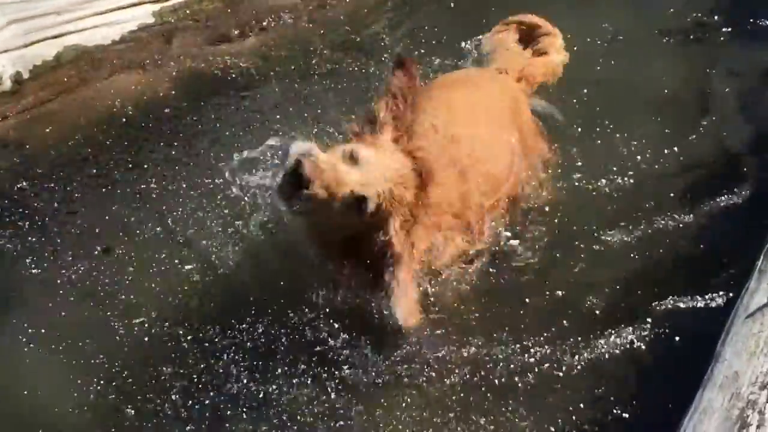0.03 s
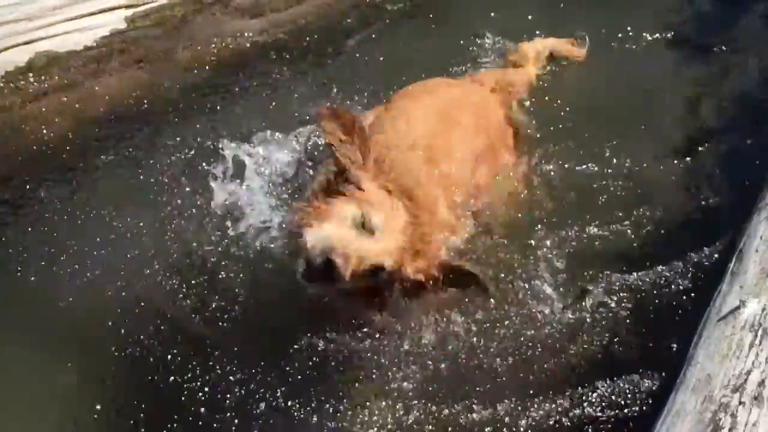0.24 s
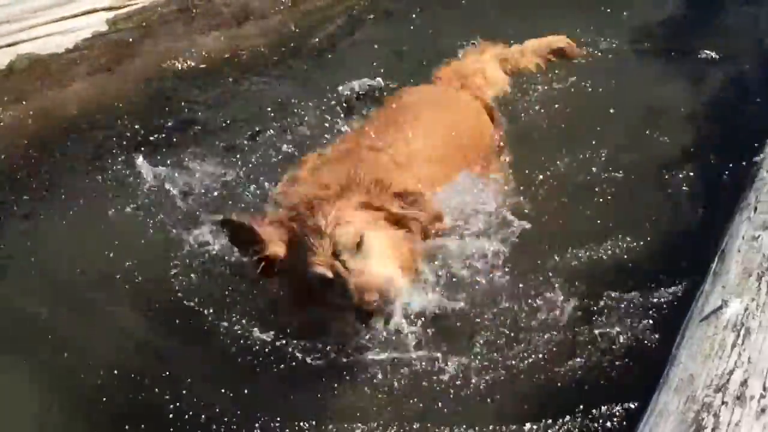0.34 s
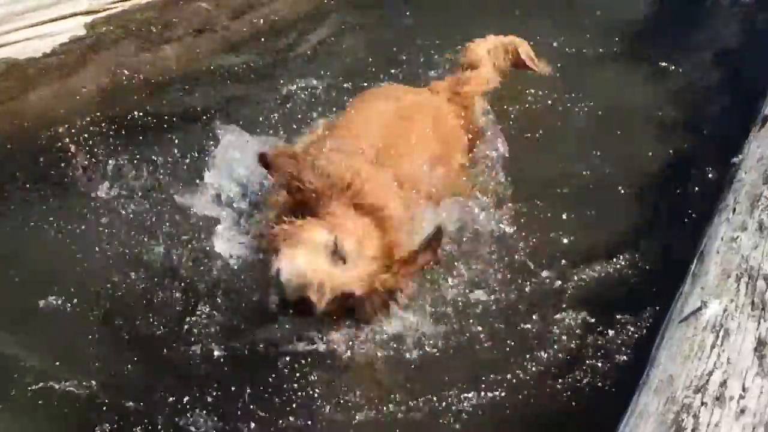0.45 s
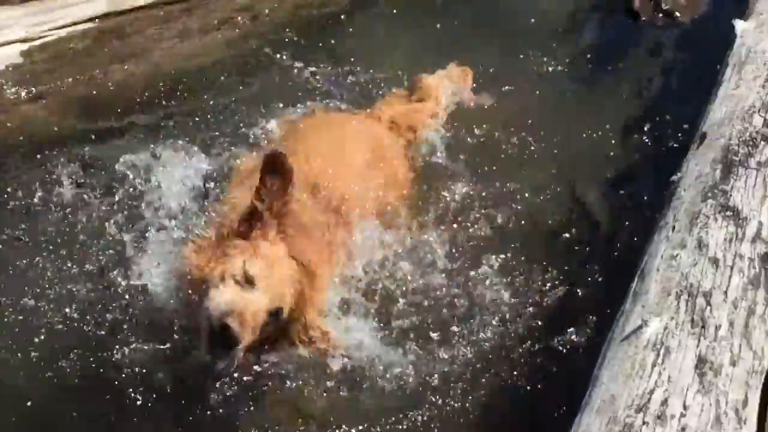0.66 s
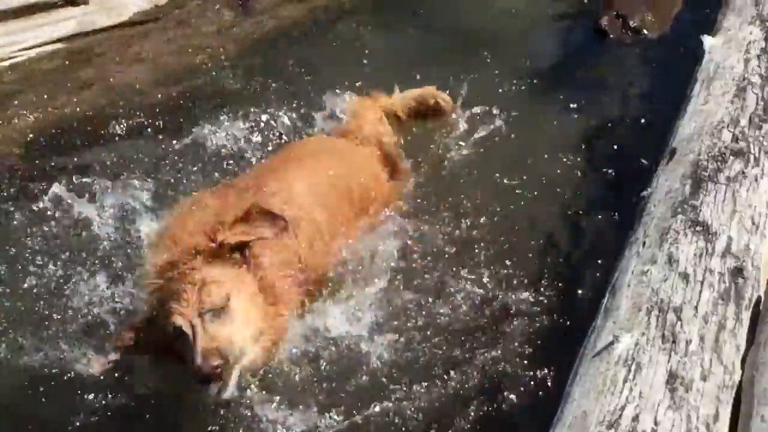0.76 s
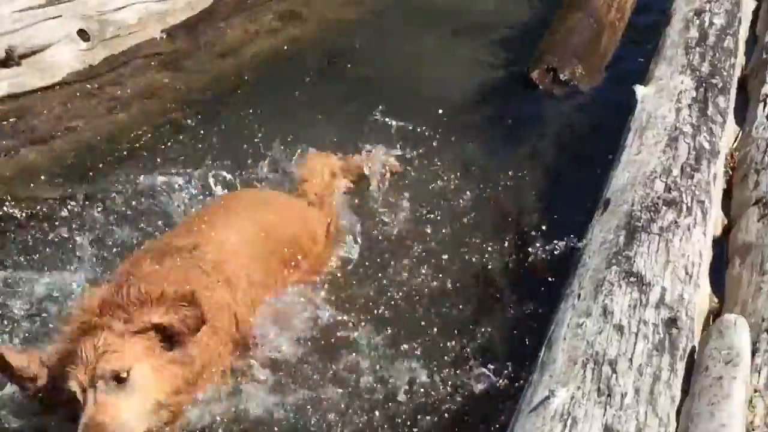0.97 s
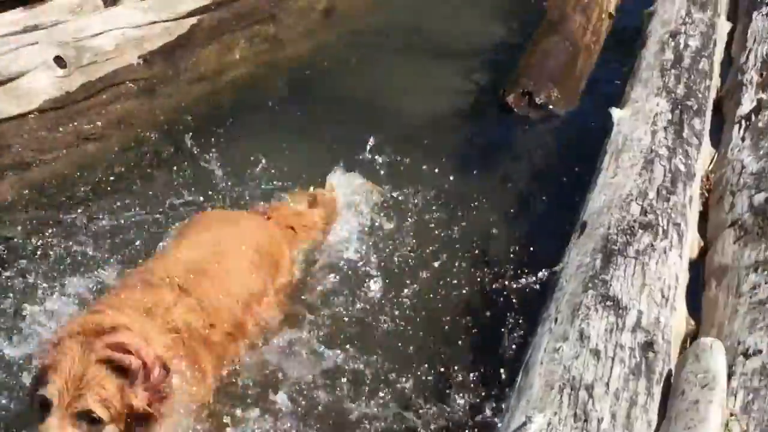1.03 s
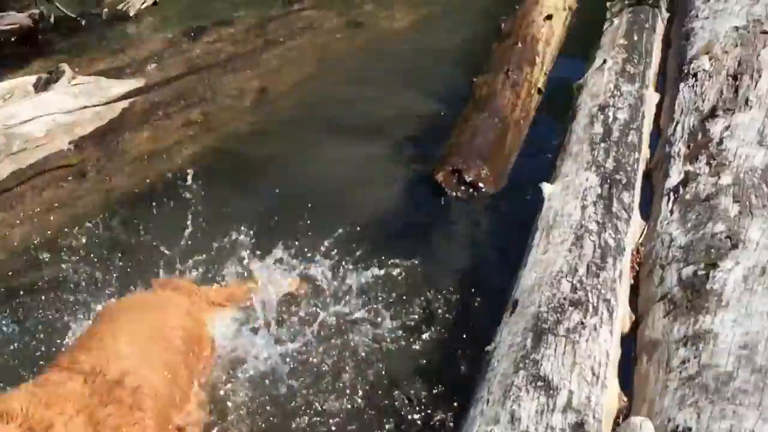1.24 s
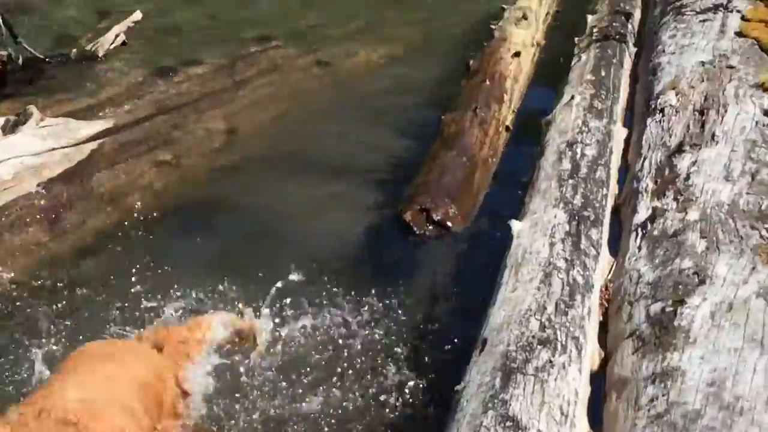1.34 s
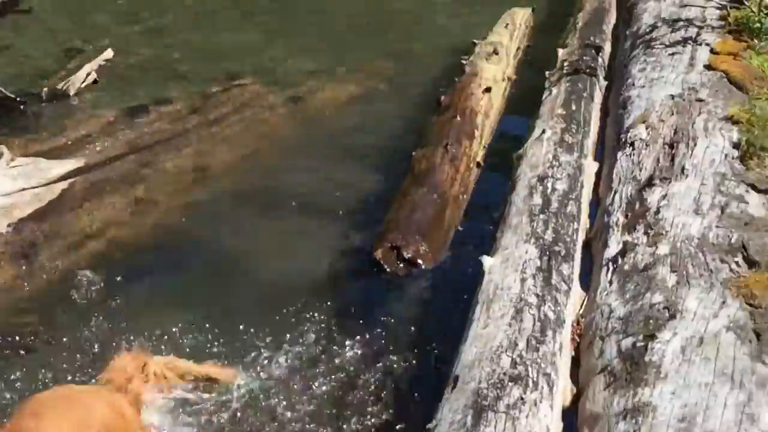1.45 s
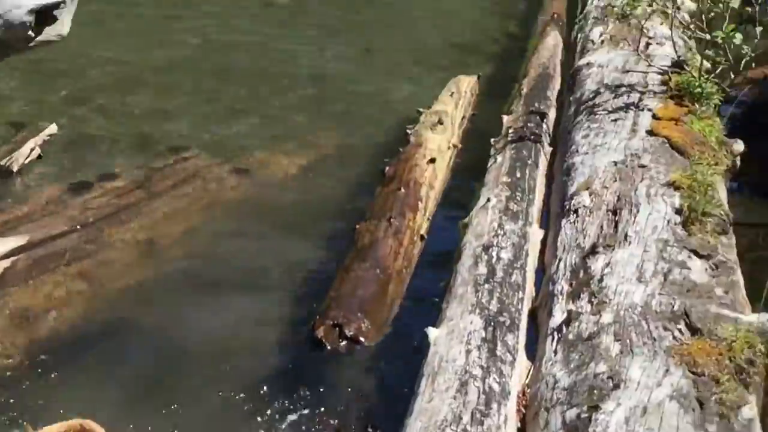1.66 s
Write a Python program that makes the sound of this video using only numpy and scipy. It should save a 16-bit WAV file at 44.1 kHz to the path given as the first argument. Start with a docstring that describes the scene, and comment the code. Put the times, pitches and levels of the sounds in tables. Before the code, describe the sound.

Close up and outdoors, a wet dog shakes off in rapid bursts of spray and ear claps. Falling drops fizz on the shallow water over a faint rumble of air, and a few soft wading splashes follow.

```python
"""A soaked dog shakes itself in a shallow lake, about ten half-turns a second, then wades off.
At each turn its ears and coat whip out a sheet of spray, and now and then a wet ear claps on its head.
Drops patter back on the lake, the legs churn the water, and trapped pockets of air ring as plops.
Ripples and nearby logs give the shaking a short echo, and moving air rumbles softly underneath."""
import sys
import numpy as np
from scipy import signal
from scipy.fft import rfft, irfft
from scipy.io import wavfile

SR = 44100
rng = np.random.default_rng(int(sys.argv[2]) if len(sys.argv) > 2 else 0)


def inscribe(sig):
    """Save sig as 16-bit PCM at rate SR to the path in sys.argv[1].

    A 1-D sig is mono; a 2-D sig holds one channel per row.
    Samples are clipped to [-1, 1] before scaling.
    """
    pcm = np.round(np.clip(np.atleast_2d(sig).T, -1, 1) * 32767)
    wavfile.write(sys.argv[1], SR, pcm.astype(np.int16))


N = 74970
TIME = np.arange(N) / SR
TOP_HZ = 15900   # treble above this is cut away


def from_db(db):
    """Turn decibels into a number to multiply by."""
    return 10 ** (np.asarray(db) / 20)


def rms_one(x):
    """Scale a sound so that its average strength (rms) is 1."""
    return x / np.sqrt(np.mean(x ** 2) + 1e-20)


def level(curve):
    """Join (time [s], level [dB]) points into a smooth volume curve."""
    return from_db(np.interp(TIME, *np.transpose(curve)))


def coloured(x, colour, tilt_db=0):
    """Shape a sound's bass and treble, brighter by tilt_db per octave; strength 1."""
    octave = np.log2(np.maximum(np.fft.rfftfreq(N, 1 / SR), 1))
    hz, db = np.transpose(colour)
    octaves_outside = np.maximum(np.log2(hz[0]) - octave, 0) + np.maximum(octave - np.log2(hz[-1]), 0)
    gain_db = np.interp(octave, np.log2(hz), db) + tilt_db * octave - 20 * octaves_outside
    return rms_one(irfft(rfft(x) * from_db(gain_db), N))


def swell(s, rise_s, fall_s):
    """A volume curve that grows to a peak at time s, then dies away."""
    return np.exp(-np.maximum((s - TIME) / rise_s, (TIME - s) / fall_s))


def wander(step_s):
    """A new random value every step, joined by straight lines."""
    return np.interp(TIME / step_s, np.arange(N), rng.standard_normal(N))


def impacts(per_s, spread_db):
    """Clicks at random times and of random sizes."""
    sizes = from_db(spread_db * np.minimum(rng.exponential(1, N), 4))
    return sizes * rng.choice([-1, 1], N) * (rng.random(N) < per_s / SR)


def pulse(s, low_hz, high_hz, order):
    """A sudden push of air at time s that swings a few times; peak 1."""
    band = signal.butter(order, [low_hz, high_hz], "band", fs=SR, output="sos")
    wave = signal.sosfilt(band, signal.unit_impulse(N, int(s * SR)) + 1e-18)
    return wave / np.abs(wave).max()


def ring(clicks, hz, ring_s):
    """Each click starts a pure tone that fades by 60 dB in ring_s."""
    decay = np.exp(-np.log(1000) / (ring_s * SR))
    angle = 2 * np.pi * hz / SR
    return signal.lfilter([0, np.sin(angle)], [1, -2 * decay * np.cos(angle), decay * decay], clicks + 1e-18)


def bubbling(clicks, low_hz, high_hz, cycles, sizes):
    """Each click rings a bubble of a random size, and small, high ones fade sooner; strength 1."""
    size = rng.integers(0, sizes, N)
    pitches = np.geomspace(low_hz, min(high_hz, TOP_HZ), sizes)
    return rms_one(sum(hz * ring(clicks * (size == k), hz, cycles / hz) for k, hz in enumerate(pitches)))


def bubble(s, hz, ring_s, attack_s):
    """One bubble rings and fades, trembling in the stirred water and rising in pitch as its air shifts."""
    climb_per_s, wobble = 1.3, 0.019   # shares of the starting pitch
    wobble_s, wobble_db = 0.0045, 1.1
    age = np.maximum(TIME - s, 0)
    volume = (1 - np.exp(-age / attack_s)) * np.exp(-np.log(1000) * age / ring_s)
    pitch = hz * (1 + climb_per_s * age + wobble * wander(wobble_s)) * (age > 0)
    return volume * from_db(wobble_db * wander(wobble_s)) * np.sin(2 * np.pi * np.cumsum(pitch) / SR)


# How loud the moving air is: (time [s], level [dB])
AIR_LEVEL = [(0, -56.5), (.5, -55.5), (1.0, -56), (1.42, -60), (1.55, -75.5), (1.7, -74)]
# Its deep tone: (frequency [Hz], relative level [dB])
AIR_COLOUR = [(20, -30), (38, -10), (60, 2), (85, 4), (130, -9), (250, -7), (600, -46)]


def air_rumble():
    """Moving air makes a soft, low noise."""
    return level(AIR_LEVEL) * coloured(rng.standard_normal(N), AIR_COLOUR)


# How strongly the legs stir the water: (time [s], relative level [dB])
STIR_LEVEL = [(0, -47), (.04, -53), (.11, -65), (.17, -41.5), (.24, -51.5), (.33, -38.5), (.44, -54),
              (.49, -32), (.545, -45), (.61, -39.5), (.66, -39), (.81, -42.5), (1.10, -40.5), (1.18, -44),
              (1.28, -38.5), (1.34, -45.5), (1.47, -46.5), (1.57, -52), (1.64, -58.5), (1.7, -53.5)]
# The tone of stirred water: (frequency [Hz], relative level [dB])
STIR_COLOUR = [(120, -24), (280, -1), (400, -6), (620, 1), (900, -0.5), (1450, 0), (2100, -3.5),
               (2700, -12.5), (4500, -3)]


def churn():
    """Small bubbles ring in the rush of water around the legs."""
    churn_db, wash_db = 2.5, -6
    bubbles = bubbling(impacts(per_s=1500, spread_db=3.5), 523.5, 3070, cycles=27.7, sizes=44)
    wash = from_db(wash_db) * coloured(rng.standard_normal(N), STIR_COLOUR)
    water = coloured(bubbles, STIR_COLOUR) + wash
    return from_db(churn_db) * level(STIR_LEVEL) * rms_one(water)


# Big bubbles: (time [s], level [dB], starting pitch [Hz], time to fade by 60 dB [s])
BIG_BUBBLES = [(.005, -34, 680, 0.054), (.052, -28.5, 653, 0.056), (0.025, -35.5, 1513, 0.11),
               (0.055, -25, 1643, 0.036), (.148, -21, 640, 0.053), (.162, -30, 1600, 0.052),
               (.163, -23, 740, 0.017), (0.228, -24.5, 680, 0.045), (.297, -23, 584, 0.02),
               (.421, -20.5, 690, 0.03), (.495, -19.5, 538, 0.039), (0.574, -22.5, 1500, 0.037),
               (.590, -16, 616, 0.025), (.629, -21, 250, 0.031), (.631, -20, 505, 0.019),
               (.704, -24.5, 600, 0.045), (0.919, -21, 880, 0.018), (.992, -24, 587, 0.06),
               (1.190, -25, 320, 0.043), (1.253, -16.5, 497, 0.016), (1.370, -19, 300, 0.069),
               (1.494, -31.5, 473, 0.13), (1.55, -37.5, 368, 0.075), (1.658, -42.5, 660, 0.066),
               (1.659, -43, 1510, 0.099), (1.664, -42, 2090, 0.082), (1.682, -46, 1030, 0.065)]


def plops():
    """The legs trap large pockets of air, and each rings with a plop."""
    return sum(from_db(db) * bubble(s, hz, ring_s, attack_s=1 / hz) for s, db, hz, ring_s in BIG_BUBBLES)


# Drops that stand out: (time [s], level [dB], starting pitch [Hz])
SINGLE_DROPS = [(.035, -34, 6400), (0.047, -28, 3660), (0.057, -33, 6300), (.063, -35, 11300),
                (.064, -35, 14900), (.129, -38, 10500), (.135, -41, 11700), (.174, -30, 12600),
                (0.247, -29, 6350), (0.264, -28, 2900), (0.348, -24.5, 6430), (1.441, -26.5, 3760),
                (1.571, -31.5, 3530)]


def pings():
    """A single drop makes a tiny bubble with a short, high ring."""
    return sum(from_db(db) * bubble(s, hz, ring_s=0.013, attack_s=0.00015) for s, db, hz in SINGLE_DROPS)


# The tone of the ringing drops: (frequency [Hz], relative level [dB])
RINGING_DROP_COLOUR = [(1000, 2), (1600, 0.5), (2400, -2), (3600, -3.5), (5000, -10), (6400, -13),
                       (9000, -10), (14000, -30)]


def plinks():
    """Some of the falling drops trap a bubble that rings a little longer."""
    rings = bubbling(impacts(per_s=280, spread_db=2), 994, 13040, cycles=49, sizes=60)
    return coloured(rings, RINGING_DROP_COLOUR)


# How much water is falling back: (time [s], relative level [dB])
PATTER_LEVEL = [(0, -53), (.06, -52.5), (.11, -51.5), (.16, -46), (.23, -44), (.45, -46), (.545, -49.5),
                (.60, -40), (.655, -47), (.82, -45.5), (1.03, -45.5), (1.24, -44), (1.34, -46.5),
                (1.42, -42.5), (1.50, -49), (1.60, -47.5), (1.64, -60), (1.7, -61.5)]
# The tone of its patter: (frequency [Hz], relative level [dB])
PATTER_COLOUR = [(1200, 5.5), (2400, -7), (3600, 4), (5000, -6.5), (6300, -2), (8000, -8), (12000, -8),
                 (15500, -10)]


def falling_spray():
    """Flung drops fizz, tick and plink on the lake, over the hiss of a fine mist."""
    patter_db, plink_db = 4, -1
    tick_db, tick_fall_s, mist_db, clump_db = 1.5, 0.0015, -1.5, -0.5
    shake_end_s, fine_above_hz, fade_db_per_s = 1.02, 4900, 12.5
    fizz = bubbling(impacts(per_s=3500, spread_db=3), 2040, 16700, cycles=15, sizes=36)
    # Bigger drops hit the surface, each with a tiny burst of noise.
    hits = np.abs(impacts(per_s=150, spread_db=-1))
    bursts = signal.lfilter([1], [1, -np.exp(-1 / (tick_fall_s * SR))], hits + 1e-18)
    ticks = from_db(tick_db) * rms_one(bursts * rng.standard_normal(N))
    mist = from_db(mist_db) * rng.standard_normal(N)
    clumps = from_db(clump_db * wander(step_s=0.01))   # the water lands unevenly
    patter = coloured((fizz + ticks) * clumps + mist, PATTER_COLOUR)
    # The finest, highest spray dies out once the shaking stops.
    coarse = signal.sosfiltfilt(signal.butter(2, fine_above_hz, fs=SR, output="sos"), patter)
    fine = (patter - coarse) * from_db(-fade_db_per_s * np.maximum(TIME - shake_end_s, 0))
    return level(PATTER_LEVEL) * (from_db(patter_db) * (coarse + fine) + from_db(plink_db) * plinks())


def echo(x):
    """Ripples and logs bounce a sound back as a short, blurred echo."""
    echo_db, fade_s, delay_s = -14, 0.038, 0.0045
    tail = rng.standard_normal(N) * np.exp(-np.log(1000) * TIME / fade_s) * (TIME > delay_s)
    return from_db(echo_db) * signal.fftconvolve(x, tail / np.linalg.norm(tail))[:N]


def wet_crackle(colour, tilt_db):
    """Wet strands of fur and flying drops make a dense crackle."""
    return coloured(impacts(per_s=14000, spread_db=3.5), colour, tilt_db)


# Soft splashes: (time [s], level [dB], rise [s], fall [s], brightness [dB per octave])
SOFT_SPLASHES = [(0.057, -39, 0.02, 0.0021, -3), (.1485, -29.5, .001, 0.0014, -1),
                 (0.164, -33, 0.0058, 0.011, -.5), (0.265, -35.5, 0.0022, 0.0029, -0.5),
                 (.300, -32.5, 0.014, 0.0058, 2.5), (0.316, -29, 0.00058, 0.0031, -3),
                 (0.349, -35.5, 0.00053, 0.006, 11), (0.401, -30, 0.0079, 0.015, -.5),
                 (0.498, -33, 0.0033, .012, 0.5), (.518, -30, 0.0095, 0.0047, 1),
                 (0.612, -32.5, 0.017, 0.015, 2), (0.729, -29, 0.011, 0.0044, -.5),
                 (0.801, -29, 0.012, 0.025, -4), (0.822, -31.5, 0.012, 0.0052, 1),
                 (0.904, -27, 0.0033, 0.0025, -0.5), (0.936, -31, 0.024, 0.0082, -1.5),
                 (1.033, -33.5, 0.0084, 0.013, 0), (1.221, -33.5, 0.0019, 0.0068, 1.5),
                 (1.250, -33.5, 0.0056, 0.0088, 5), (1.371, -31.5, 0.0023, 0.0054, -3.5),
                 (1.407, -39.5, 0.0019, 0.015, -3), (1.4967, -30.5, 0.0005, 0.002, 0),
                 (1.53, -41, 0.00082, 0.0015, 16), (1.548, -34, 0.0027, 0.0075, 1.5),
                 (1.573, -43, 0.00084, 0.0012, -1)]
# Their tone: (frequency [Hz], relative level [dB])
SPLASH_COLOUR = [(230, 0), (400, -3), (700, 4), (1500, 1.5), (2400, -8), (3500, 0), (5000, -6.5),
                 (6500, -6.5), (10000, -12), (15500, -16)]


def soft_splashes():
    """Wet fur swishes between turns, and the feet splash lightly as the dog wades off."""
    return sum(from_db(db) * swell(s, rise_s, fall_s) * wet_crackle(SPLASH_COLOUR, tilt_db)
               for s, db, rise_s, fall_s, tilt_db in SOFT_SPLASHES)


# Ear slaps: (time [s], level [dB], low edge [Hz], high edge [Hz], ring pitch [Hz], ring vs. slap [dB])
EAR_SLAPS = [(0.2576, -13.5, 2780, 6600, 6090, -1.5), (0.3129, -7.5, 594, 2240, 780, -1),
             (0.5855, -20, 1300, 11300, 1500, -2), (0.6305, -10, 800, 3440, 1440, -15),
             (0.7904, -6, 860, 1670, 1370, -2), (1.0411, -16.5, 1510, 4400, 4080, -7),
             (1.1222, -12, 3000, 6100, 3560, -6)]


def ear_claps():
    """A wet ear slaps the head, and the pocket of air under it rings briefly."""
    out = np.zeros(N)
    low_cut = signal.butter(2, 810, "high", fs=SR, output="sos")
    for s, db, low_hz, high_hz, ring_hz, ring_db in EAR_SLAPS:
        pocket = signal.sosfilt(low_cut, bubble(s, ring_hz, ring_s=0.014, attack_s=0.0003))
        out += from_db(db) * (pulse(s, low_hz, high_hz, order=3) + from_db(ring_db) * pocket)
    return out


# Half-turns: (time [s], spray level [dB], rise [s], fall [s], brightness [dB per octave], thump [dB])
HALF_TURNS = [(.0830, -21.5, 0.0018, 0.0029, 1.5, -36.5), (0.1865, -19, 0.00033, 0.003, 3, -34.5),
              (.2582, -18.5, 0.00084, 0.0034, -1.5, -54), (0.3747, -21, 0.0034, 0.0052, .6, -33),
              (0.4859, -25.5, 0.0029, 0.0038, 4, -33.5), (0.582, -16, 0.00083, 0.0026, 2, -34.5),
              (.6950, -21, 0.0021, 0.0063, -.5, -33), (0.7922, -16.5, 0.0027, 0.0011, 3.6, -34),
              (0.8976, -23.5, 0.0024, 0.0062, 3, -36.5), (0.9984, -23, 0.0014, 0.0084, 2.2, -34),
              (1.1224, -23, 0.0013, 0.0019, 3, -64)]
# The tone of spray leaving the coat: (frequency [Hz], relative level [dB])
TURN_COLOUR = [(200, -22), (500, -3), (1200, 6.5), (2300, -1), (3600, 4), (5000, -3), (6500, -3.5),
               (10000, -8.5), (15500, -14)]


def coat_whips():
    """At each half-turn the ears and coat fling a sharp burst of spray, and the skin thumps softly."""
    thump_lead_s = 0.0031   # the skin pushes air just before the spray peaks
    out = np.zeros(N)
    for s, db, rise_s, fall_s, tilt_db, thump_db in HALF_TURNS:
        out += from_db(db) * swell(s, rise_s, fall_s) * wet_crackle(TURN_COLOUR, tilt_db)
        out += from_db(thump_db) * pulse(s - thump_lead_s, low_hz=90, high_hz=308, order=2)
    return out


def scene():
    """Add the dog, its echo, the lake and the air into one channel."""
    dog = coat_whips() + soft_splashes() + ear_claps()
    lake = plops() + pings() + falling_spray() + churn()
    air = air_rumble()
    return (dog + echo(dog) + lake + air)[None]


def record(dry):
    """The microphone loses the deep bass, and the highest treble is cut steeply."""
    bass_cut = signal.butter(2, 50, "high", fs=SR, output="sos")
    treble_cut = signal.ellip(10, .1, 80, TOP_HZ, fs=SR, output="sos")
    return signal.sosfilt(treble_cut, signal.sosfilt(bass_cut, dry))


dry = scene()
out = record(dry)
inscribe(out)
```